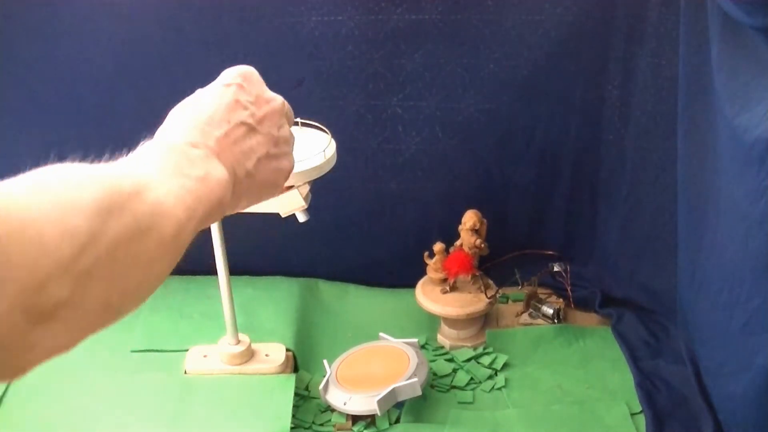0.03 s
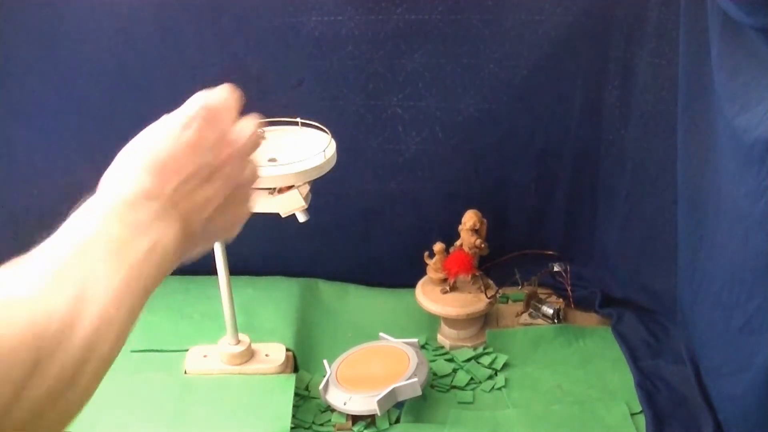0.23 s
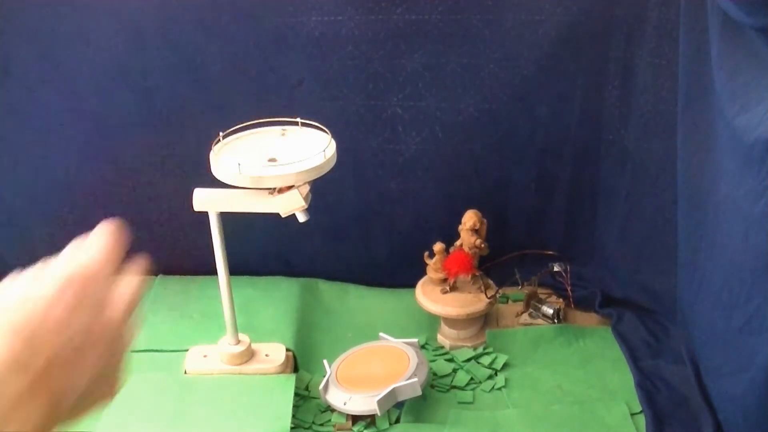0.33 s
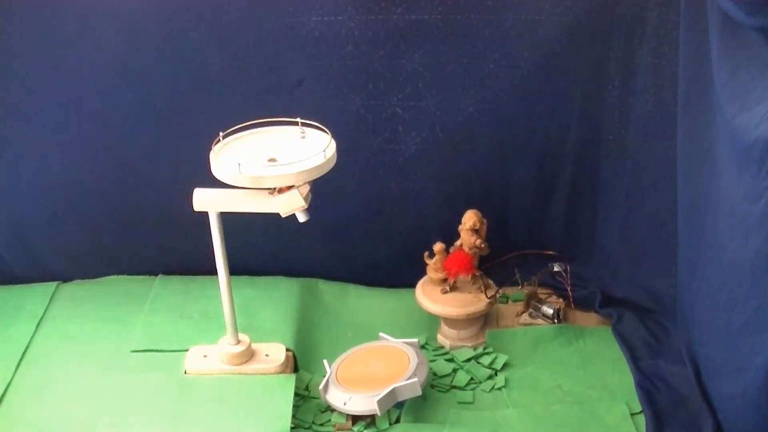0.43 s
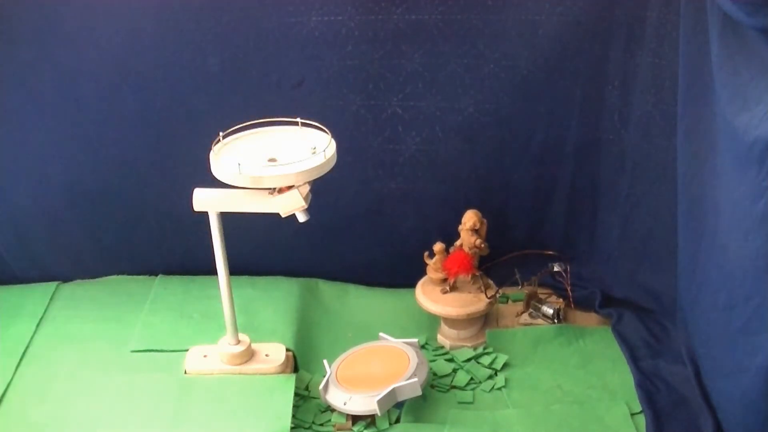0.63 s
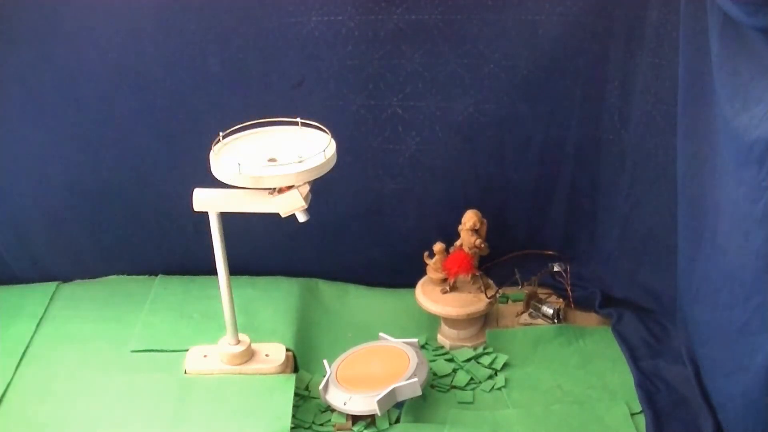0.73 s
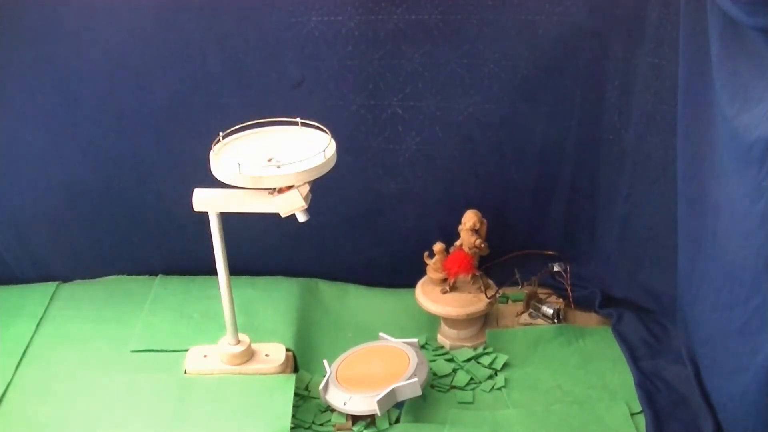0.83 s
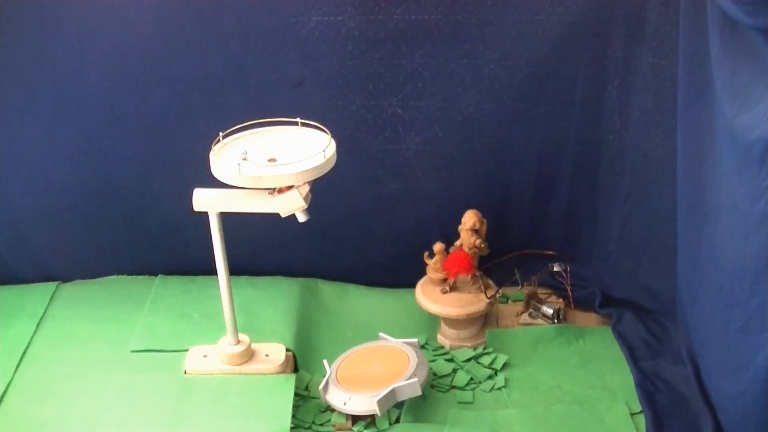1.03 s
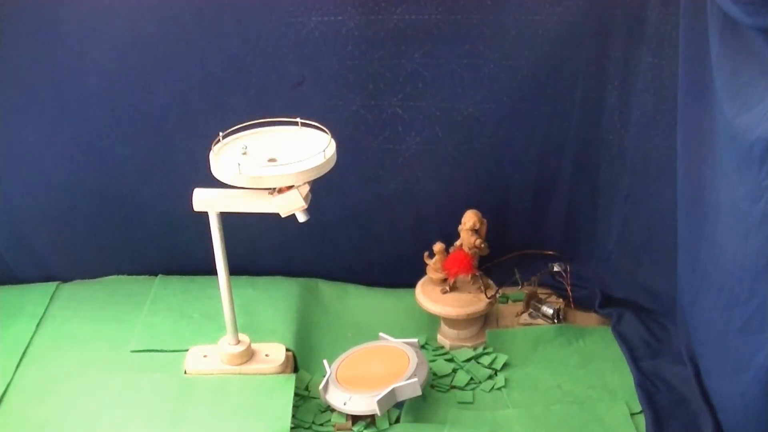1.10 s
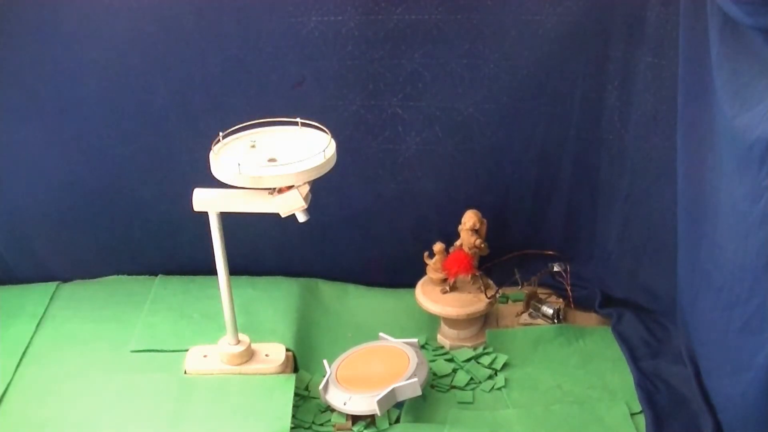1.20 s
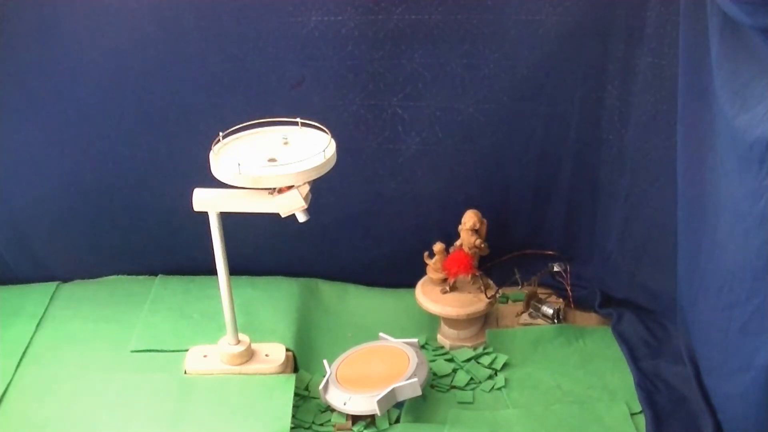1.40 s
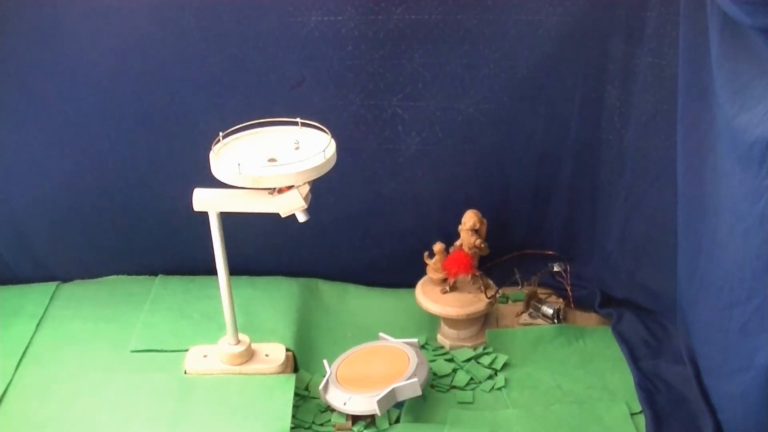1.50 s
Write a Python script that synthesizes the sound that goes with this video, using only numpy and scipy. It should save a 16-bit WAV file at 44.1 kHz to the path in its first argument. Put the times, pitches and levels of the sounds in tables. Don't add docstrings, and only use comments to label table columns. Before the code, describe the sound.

A small hard ball clacks onto a thin wooden tray, rattles, bounces and softly rolls round.

```python
import sys
import numpy as np
from scipy import signal
from scipy.fft import rfft, irfft
from scipy.io import wavfile
from scipy.ndimage import uniform_filter1d

SR = 44100
rng = np.random.default_rng(int(sys.argv[2]) if len(sys.argv) > 2 else 0)


def to_linear_factor(level_db):
    exponent = np.asarray(level_db, float) / 20
    return 10 ** exponent


def bounce(signal):
    frames = np.transpose(np.atleast_2d(signal))
    limited = np.clip(frames, -1, 1)
    pcm = np.round(limited * 32767).astype(np.int16)
    wavfile.write(sys.argv[1], SR, pcm)


N = 68355
T = np.arange(N) / SR

# start in seconds, level in dB, contact time in ms, tick level in dB.
MIDDLE_HITS = [
    (0.2397, -21.5, 0.029, -39.5),
    (0.2421, -23.5, 0.024, -45),
    (0.2453, -27, 0.024, -54),
]
# seconds, dB, ms, dB.
RIM_HITS = [
    (0.2437, -28.5, 0.032, -54),
    (0.2984, -31, 0.03, -49),
    (0.3020, -30.5, 0.047, -67),
    (0.3246, -37.5, 0.048, -65),
    (0.3288, -41, 0.047, -72),
]
# seconds, dB, ms, dB.
OFF_HITS = [(0.3620, -48.5, 0.024, -75), (0.3670, -62, .04, -77), (0.4050, -39.5, 0.047, -65),
            (0.4270, -50, .04, -69), (0.4375, -53, 0.064, -76), (0.5036, -61, 0.057, -70),
            (0.6270, -57.5, 0.039, -79), (0.6920, -57, 0.046, -78), (0.7380, -55.5, 0.11, -84),
            (0.8371, -55, 0.058, -74), (0.9750, -59, 0.22, -80), (1.1803, -60.5, 0.055, -80)]

# pitch in Hz, level in dB, time to fade by 60 dB in seconds.
MIDDLE_MODES = [(1170, -38, 0.071), (1405, -15.5, 0.21), (1524, -8.5, 0.06), (1940, -14.5, 0.1),
                (2220, -13, 0.059), (2450, -25, 0.31), (2916, -10, 0.039), (3670, -11.5, 0.17),
                (4680, 4.5, 0.013), (4554, -4, 0.085), (5004, -18, 0.15), (5030, -14, 0.068),
                (5144, -1, 0.085), (5297, -18, 0.19)]
# Hz, dB, seconds.
RIM_MODES = [(1142, -16.5, 0.082), (1434, -25, .11), (1506, -9, 0.11), (2010, -32, 0.064),
             (2311, 3.5, 0.048), (2558, -8.5, 0.076), (3312, 0.5, 0.023), (4143, -9.5, .04),
             (4620, 0, 0.021), (5280, -22.5, 0.1), (6250, -8, 0.012), (7840, -23, 0.015),
             (4730, -2.5, 0.022), (1730, -8, 0.017)]
# Hz, dB, seconds.
OFF_MODES = [(853, -8, 0.092), (1111, -11, 0.11), (1398, -3, 0.092), (1504, -7.5, 0.075), (2064, -1, 0.015),
             (2290, -7, 0.075), (3340, -15, 0.07), (1860, 9.5, 0.0043)]
# Hz, dB, seconds.
STAND_MODES = [(110, -40.5, 0.37), (291, -40, 0.12), (462, -38, 0.14), (565, -34, 0.075), (655, -34, 0.12),
               (836, -43, 0.21)]

# pitch in Hz, level in dB per Hz.
CLATTER_COLOUR = [(590, -76), (1280, -20), (1450, -2), (2400, -4.5), (2750, -15), (3100, -4), (4800, -2),
                  (8500, -14.5), (15500, -33)]
# pitch in Hz, time to fade by 60 dB in seconds.
CLATTER_FADE = [(1500, 0.097), (4000, 0.076), (8000, 0.089), (14000, 0.052)]

# time in seconds, tray level in dB, rail chatter level in dB.
ROLL = [(0.46, -67, -105), (0.574, -77.5, -58), (0.774, -68.5, -71), (0.888, -70.5, -89), (1.078, -86, -92),
        (1.148, -74, -96), (1.29, -76, -101), (1.312, -66.5, -78), (1.452, -96, -69), (1.48, -81, -97.5),
        (1.524, -78, -91), (1.55, -90, -84)]
# time in seconds, level in dB.
RUSTLE = [(0.46, -80), (0.566, -67.5), (0.708, -66.5), (0.762, -73), (0.806, -62), (1.002, -66),
          (1.018, -104), (1.17, -71.5), (1.258, -82), (1.36, -64.5), (1.53, -78), (1.55, -86)]
# pitch in Hz, level in dB per Hz.
CLOTH_COLOUR = [(180, -28), (400, -7.5), (1400, -4), (2500, -3.5), (4200, -8.5), (6500, -8.5),
                (10000, -17.5), (15500, -34)]
# start in seconds, length in seconds, level in dB,
# pitch in Hz.
CREAKS = [
    (1.19, .09, -67, 310),
    (0.155, 0.017, -69.5, 640),
    (0.53, .04, -70, 237),
    (0.84, 0.053, -64, 1300),
    (1.9, .05, -74, 270),
    (0.84, 0.75, -79, 85),
]

# delay in ms, level in dB, left above right in dB.
ECHOES = [
    (2.6, -20, 6),
    (5.6, -30, -3),
    (8.0, -21.5, -1),
    (16.5, -18, -4),
]

# pitch in Hz, level in dB per Hz.
HUM_COLOUR = [(15, -35), (25, -6), (233, -1.5), (410, -5), (495, -5), (598, -6.5), (1570, -11), (4750, -15),
              (15500, -25.5)]
# pitch in Hz, side above middle in dB.
HUM_SIDE = [(60, -6.5), (110, -2), (200, -6.5), (380, -4.5), (700, -6.5), (1290, -6.5), (2380, -7.5),
            (4400, -8.5), (8120, -9), (15000, -12.5)]
# pitch in Hz, left above right in dB.
HUM_LEFT = [(30, -6), (80, 9), (160, 0.3), (600, 1.5), (2000, 2), (12000, 0.4)]

CLATTER_DB, RIM_CLATTER_DB, OFF_CLATTER_DB = 3.5, -4.5, -11.5
BURST_DB, BURST_S = 3.5, 0.0028
WOBBLE_DB, WOBBLE_PER_S = 2.5, 120
TICK_HZ, TICK_WIDTH_HZ, TICK_S = 10100, 7900, 0.0018
RADIATES_HZ = 1087
CHATTER_HZ, CHATTER_WIDTH_HZ = 4920, 690
ROLL_DB, ROLL_SOFT_HZ, ROLL_ROUGH_DB = -3.5, 2460, 4.0
ROOM_T60_S, ROOM_DB, ROOM_TOP_HZ = 0.17, -20.5, 12100
PAN_DB, HUM_DB = 1.44, -66.5
SIDES = np.array([[0.5], [-0.5]])
LEAD_S, LEAD_DB = 0.023, -28.5


def on_log(table, hz):
    a = np.array(table, float)
    return np.interp(np.log(np.maximum(hz, 1)), np.log(a[:, 0]), a[:, 1])


def curve(table, col=1):
    a = np.array(table, float)
    return np.interp(T, a[:, 0], a[:, col], left=-120)


def unit(x):
    return x / np.sqrt(np.mean(x ** 2))


def noise(*tables):
    hz = np.fft.rfftfreq(N, 1 / SR)
    colour = to_linear_factor(sum(on_log(table, hz) for table in tables))
    return irfft(rfft(rng.standard_normal(N)) * colour, N)


def walk(rate):
    k = int(SR / rate)
    steps = np.repeat(rng.standard_normal(N // k + 1), k)
    return unit(uniform_filter1d(steps, k)[:N])


def band(x, hz, width_hz):
    edges = [hz - width_hz / 2, hz + width_hz / 2]
    return signal.sosfilt(signal.butter(2, edges, "band", fs=SR, output="sos"), x)


def low_pass(x, order, hz):
    return signal.sosfilt(signal.butter(order, hz, fs=SR, output="sos"), x)


def ring(modes):
    t = T[:SR // 2]
    out = 0
    for k, (hz, db, t60) in enumerate(modes):
        wobble = WOBBLE_DB * walk(WOBBLE_PER_S)[:len(t)]
        level = to_linear_factor(db - 60 * t / t60 + wobble)
        out = out + (-1) ** k * level * np.sin(2 * np.pi * hz * t)
    return out


def clatter():
    t = T[:SR // 2]
    dense = unit(noise(CLATTER_COLOUR))[:SR // 2]
    out = 0
    for hz in 1000 * 2 ** np.arange(0, 4.1, 0.5):
        fade = to_linear_factor(-60 * t / on_log(CLATTER_FADE, hz))
        out = out + band(dense, hz, hz * 0.31) * fade
    return out * (1 + to_linear_factor(BURST_DB) * np.exp(-t / BURST_S))


def ball():
    tray, ticks, stand = 0, 0, 0
    hiss = unit(band(rng.standard_normal(N), TICK_HZ, TICK_WIDTH_HZ))
    places = (
        (MIDDLE_HITS, MIDDLE_MODES, CLATTER_DB),
        (RIM_HITS, RIM_MODES, RIM_CLATTER_DB),
        (OFF_HITS, OFF_MODES, OFF_CLATTER_DB),
    )
    for hits, modes, clatter_db in places:
        pushes = 0
        for start, db, ms, tick_db in hits:
            t = np.maximum(T - start, 0)
            push = t * np.exp(-t / (ms / 1000))
            pushes = pushes + to_linear_factor(db) * push / push.sum()
            ticks = ticks + to_linear_factor(tick_db) * hiss * np.exp(-t / TICK_S) * (t > 0)
        answer = ring(modes) + to_linear_factor(clatter_db) * clatter()
        tray = tray + signal.fftconvolve(pushes, answer)[:N]
        stand = stand + signal.fftconvolve(pushes, ring(STAND_MODES))[:N]
    tray = signal.sosfilt(signal.butter(6, RADIATES_HZ, "high", fs=SR, output="sos"), tray)
    return tray + ticks + stand


def rolling():
    grit = rng.standard_normal(N) * to_linear_factor(ROLL_ROUGH_DB * walk(150))
    soft = low_pass(grit, 2, ROLL_SOFT_HZ)
    body = unit(signal.fftconvolve(soft, ring(OFF_MODES))[:N])
    rail = band(rng.standard_normal(N), CHATTER_HZ, CHATTER_WIDTH_HZ)
    rail = unit(rail * to_linear_factor(2.0 * walk(60)))
    return body * to_linear_factor(curve(ROLL)) + rail * to_linear_factor(curve(ROLL, col=2) - 5)


def rustle():
    cloth = unit(noise(CLOTH_COLOUR) * to_linear_factor(0.67 * walk(90)))
    return cloth * to_linear_factor(curve(RUSTLE))


def creaks():
    out = 0
    for start, length, db, hz in CREAKS:
        swell = np.sin(np.pi * np.clip((T - start) / length, 0, 1))
        rub = unit(band(rng.standard_normal(N), hz, hz * 0.61))
        out = out + rub * to_linear_factor(db) * swell
    return out


def room(x):
    t = T[:SR // 2]
    tail = rng.standard_normal((2, len(t))) * to_linear_factor(-60 * t / ROOM_T60_S)
    tail = tail * np.clip(t / 0.0047, 0, 1)
    tail = low_pass(tail, 1, ROOM_TOP_HZ) * to_linear_factor(ROOM_DB - 30.5)
    out = x * to_linear_factor(PAN_DB * SIDES) + signal.fftconvolve(x[None], tail, axes=1)[:, :N]
    for ms, db, pan_db in ECHOES:
        out = out + to_linear_factor(db + pan_db * SIDES) * np.roll(x, int(ms / 1000 * SR))
    return out


def hum():
    mid, side = noise(HUM_COLOUR), noise(HUM_COLOUR, HUM_SIDE)
    hz = np.fft.rfftfreq(N, 1 / SR)
    lean = to_linear_factor(on_log(HUM_LEFT, hz) * SIDES)
    pair = irfft(rfft(np.array([mid + side, mid - side])) * lean, N)
    return pair * to_linear_factor(HUM_DB) / np.sqrt(np.mean(mid ** 2))


def scene():
    return room(ball() + to_linear_factor(ROLL_DB) * rolling() + rustle() + creaks()) + hum()


def band_limit(x):
    return signal.sosfilt(signal.butter(12, 15810, fs=SR, output="sos"), x)


def record(dry):
    k = int(LEAD_S * SR)
    loudness = np.sqrt(uniform_filter1d(dry.mean(axis=0) ** 2, k))
    ahead = np.roll(loudness, -k // 2)
    hiss = unit(band(rng.standard_normal(dry.shape), 5160, 8960))
    return band_limit(dry + hiss * ahead * to_linear_factor(LEAD_DB))


dry = scene()
out = record(dry)
bounce(out)
```